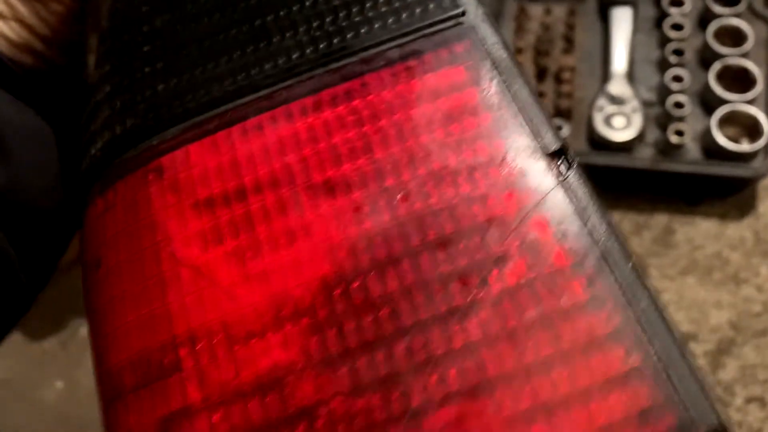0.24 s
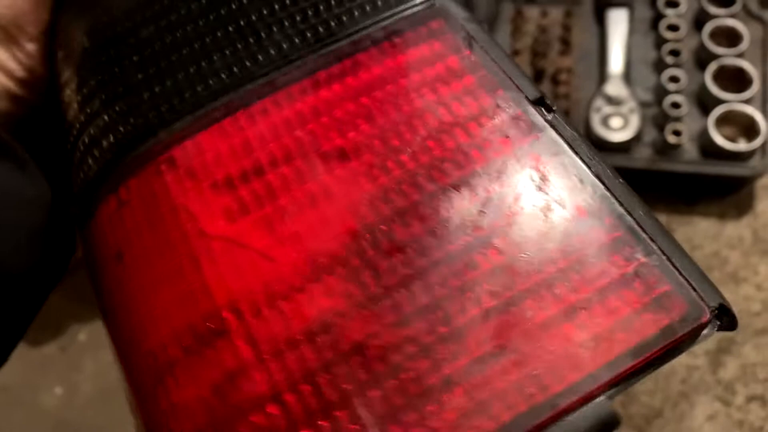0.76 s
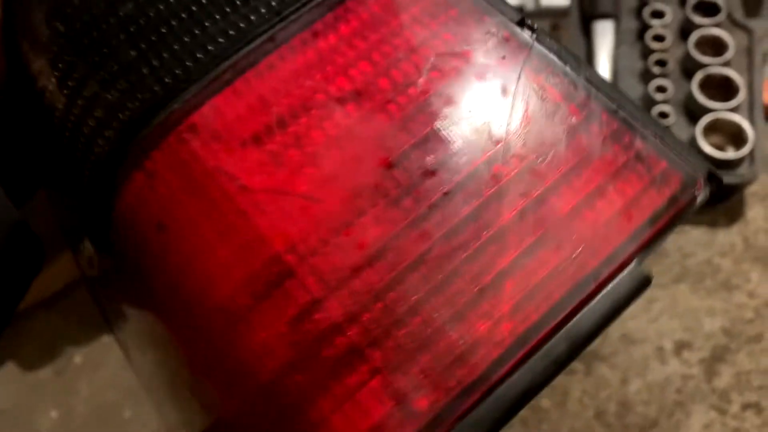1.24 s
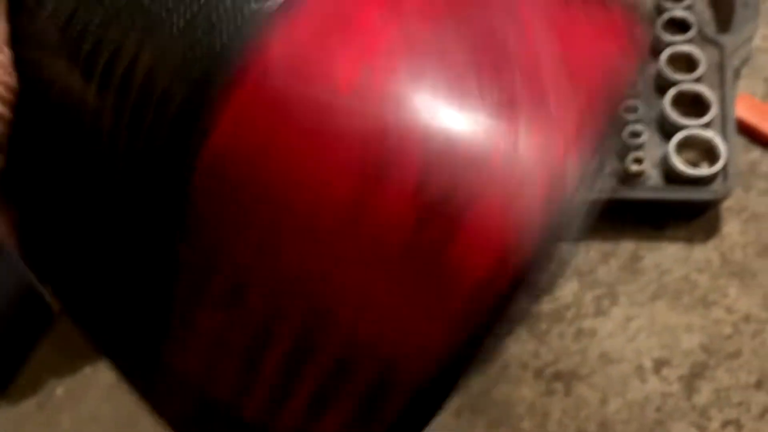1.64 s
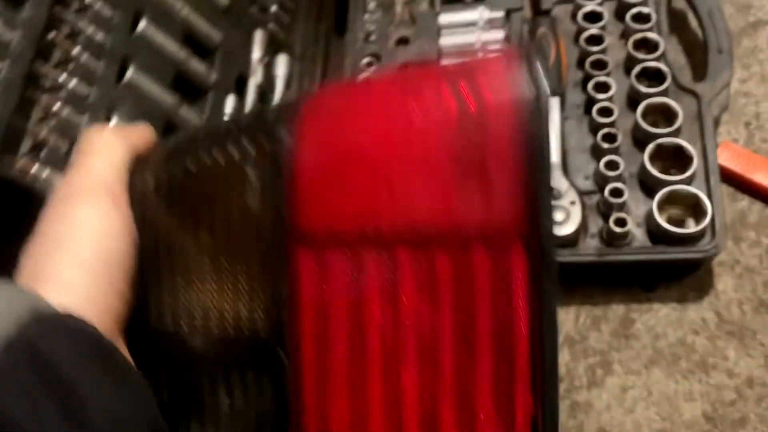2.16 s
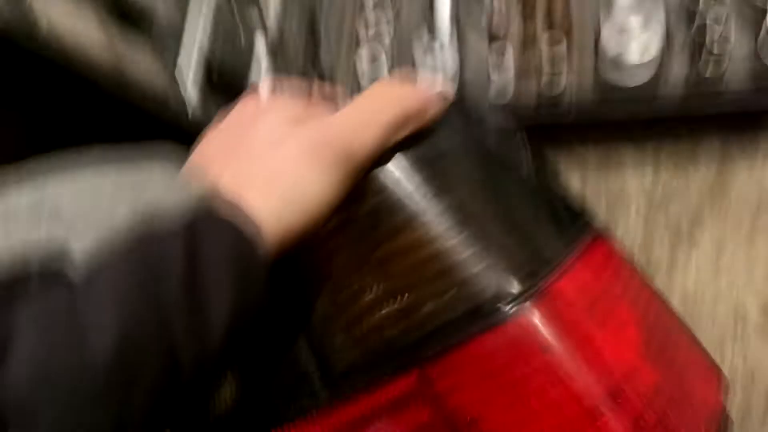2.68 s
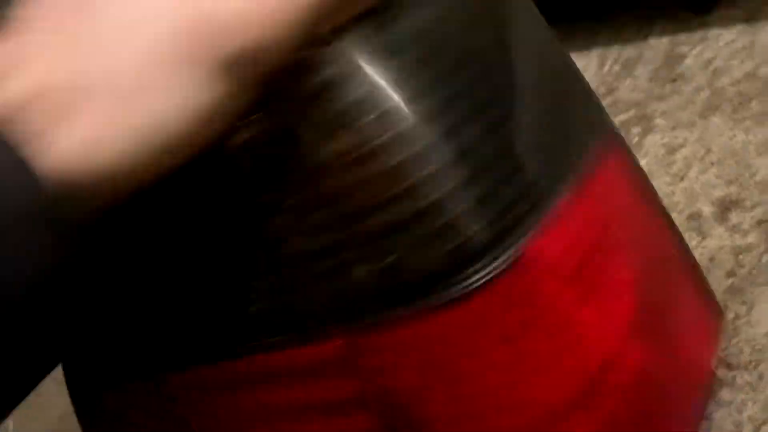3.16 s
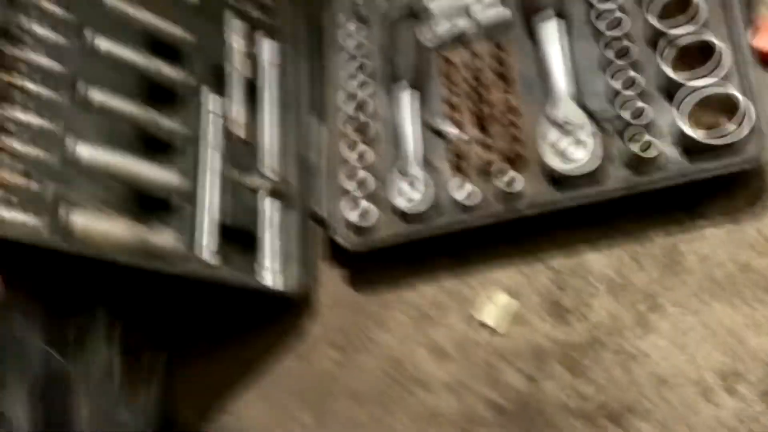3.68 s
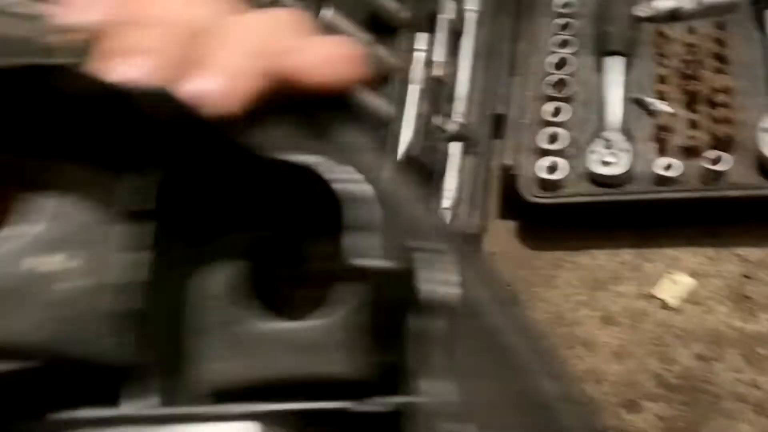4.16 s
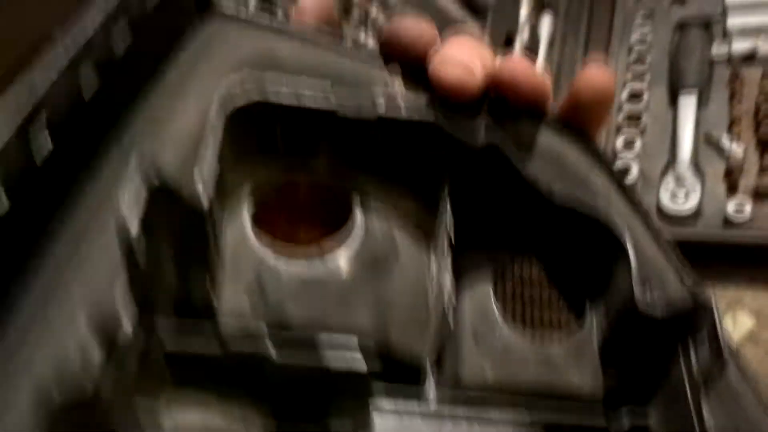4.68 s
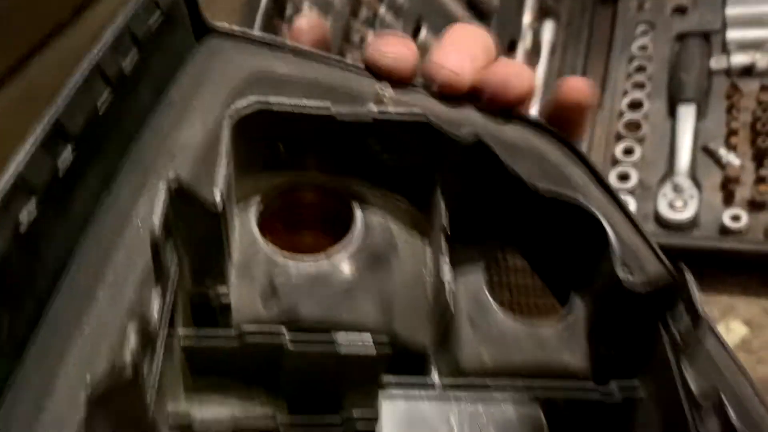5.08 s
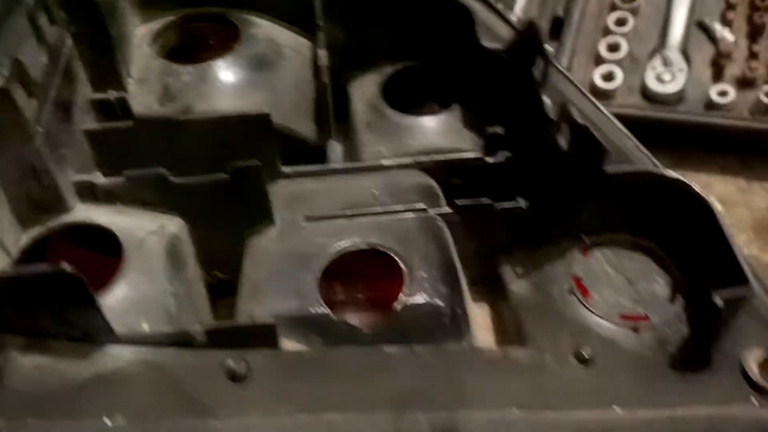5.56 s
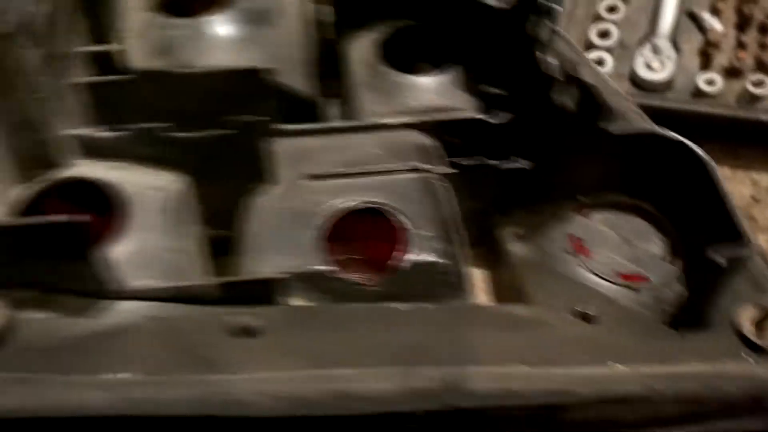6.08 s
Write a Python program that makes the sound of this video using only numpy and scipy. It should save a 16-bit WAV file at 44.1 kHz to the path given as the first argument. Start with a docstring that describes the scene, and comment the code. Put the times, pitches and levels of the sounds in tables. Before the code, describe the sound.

A hollow plastic car light housing is turned over in the hands in a quiet garage. A few faint finger clicks grow into a cluster of light taps and a soft rasp, then one sharp, hollow knock stands out. More taps, a crisp click and some rubbing follow before the handling settles. A sleeve swishes softly, and the close microphone picks up low bumps and rumble from the hand holding it.

```python
"""A hollow plastic lamp housing rings as it is turned over in the hands in a quiet garage.
Fingers tap, slip and rub on the shell, driving its cavity and panel modes; once it is knocked hard.
Strokes across ribs rasp, a sleeve swishes by cloth friction, and the hand that holds the microphone
passes on low bumps and rumble. Behind them: a faint squeak, a low wavering hum and still air."""
import sys
import numpy as np
from scipy import signal
from scipy.fft import rfft, irfft, next_fast_len
from scipy.io import wavfile

SR = 44100
rng = np.random.default_rng(int(sys.argv[2]) if len(sys.argv) > 2 else 0)


def wrap_up_sound(samples):
    """Save the sound to the file named by the first command line argument, as 16-bit audio."""
    columns = np.atleast_2d(samples).T
    # keep every value between -1 and 1, then stretch to whole-number steps
    tamed = np.clip(columns, -1, 1)
    steps = np.round(tamed * 32767).astype(np.int16)
    wavfile.write(sys.argv[1], SR, steps)


N = 278712
TIME_S = np.arange(N) / SR

# Finger contacts. Each row: start in seconds, crack level in dB, panel level in dB, cavity level in dB,
# first touch over the slip grains in dB, liveliest panel frequency in Hz, liveliest cavity frequency in Hz.
CONTACTS = [(0.414, -36.5, -56, -53, 6, 1030, 436), (0.453, -38, -57.5, -50, 6, 1790, 500),
            (0.5846, -36, -48, -50, 11, 1720, 480), (1.0493, -77, -66, -53.5, 19, 840, 510),
            (1.1576, -32.5, -52.5, -44, 10.5, 1140, 470), (1.4432, -52, -59, -83, 18, 1040, 320),
            (1.459, -60, -60.5, -56, 8, 1150, 295), (1.534, -55, -63, -70, 6, 1625, 510),
            (1.692, -33.5, -54, -43, 11, 1230, 336), (1.7302, -33, -55, -34.5, 8, 850, 570),
            (1.798, -32.5, -51, -35, 6.5, 810, 310), (1.8425, -59, -60, -73, 7, 1130, 357),
            (1.889, -36, -56, -48.5, 9, 1150, 530), (1.941, -33, -53, -36.5, 9, 1150, 302),
            (1.9663, -28.5, -44, -57, 12, 1200, 334), (1.9925, -45, -57, -43, 26, 821, 523),
            (2.035, -31.5, -55, -38.5, 3, 1200, 290), (2.06, -42, -51, -44, -3, 1200, 312),
            (2.091, -39, -55, -41, 13, 1230, 340), (2.118, -43, -52, -68, 9, 3636, 328),
            (2.5384, -48, -70, -39, 38, 2520, 400), (2.5505, -39, -53, -38, -1, 830, 625),
            (2.7563, -15, -17.5, -1.8, 14, 1060, 427), (2.823, -28.5, -41, -29, 1, 966, 444),
            (2.8455, -35, -46, -29, 24, 790, 456), (2.859, -31.5, -37.5, -40, -7, 2060, 394),
            (2.887, -32, -48, -44.5, 15, 880, 467), (2.9507, -43.5, -59, -62, 25, 1770, 507),
            (2.972, -41.5, -71, -42, 7, 860, 598), (3.0008, -39.5, -47, -68, 26, 1500, 470),
            (3.097, -57, -58, -79, 10, 1660, 425), (3.1746, -34.5, -52.5, -49, 21, 4920, 604),
            (3.1905, -33, -46.5, -42.5, -2, 1150, 600), (3.208, -44, -56, -62, 8, 1080, 570),
            (3.2247, -40, -57, -47, 18, 1120, 625), (3.264, -29, -46.5, -64, 7, 1940, 423),
            (3.2804, -32, -55.5, -46.5, 7, 1170, 517), (3.338, -41, -51.5, -54.5, 4, 1360, 417),
            (3.4142, -31, -47.5, -66.5, 7, 1455, 478), (3.5439, -39.5, -60.5, -55.5, 16, 1183, 436),
            (3.667, -39.5, -59, -48, 7.5, 820, 438), (3.6934, -42.5, -71, -46, 6, 827, 416),
            (3.7758, -43, -49, -44, 6, 1290, 627), (3.793, -41, -54, -43, 26, 1760, 522),
            (3.821, -55, -62, -42.5, -3, 780, 292), (3.8422, -39, -59, -51, 27, 1240, 400),
            (3.903, -34.5, -50, -40.5, -14, 1230, 530), (3.9202, -36, -50, -38, 6, 1230, 436),
            (3.94, -34, -64, -51, 4, 810, 413), (3.985, -59, -48, -48.5, 28, 1040, 430),
            (4.024, -47, -51, -73, -15, 1030, 440), (4.0515, -41, -52.5, -35, -14, 1140, 337),
            (4.1434, -39, -56, -53, 18, 1000, 470), (4.3067, -22.5, -31, -53, 1, 1220, 642),
            (4.3139, -20, -37, -30.5, 11, 1240, 468), (4.369, -34.5, -62, -58, 13, 3470, 420),
            (4.4447, -35.5, -57, -74, 6, 3600, 382), (4.472, -47, -45.5, -61.5, -12, 830, 440),
            (4.6125, -32, -38.5, -59, 8.5, 944, 460), (4.874, -42, -45, -54, -1, 774, 513),
            (4.972, -48.5, -57, -56.5, 16, 1920, 528), (4.993, -48, -58.5, -53, 10, 1500, 480),
            (5.054, -36, -46.5, -57, 8.5, 1190, 430), (5.0717, -35, -51, -66, 23, 4197, 442),
            (6.061, -55, -63, -72, 22, 794, 574)]


def shell(hard_knock_db=-25):
    """Fingers ring, rub and crack the shell. Light contacts favour some modes; a hard knock does not."""
    _, crack_db, panel_db, cavity_db, touch_db, panel_hz, cavity_hz = np.transpose(CONTACTS)
    bursts = slips(touch_db)
    light = cavity_db <= hard_knock_db
    n_cavity, n_modes = len(CAVITY_MODES), len(CAVITY_MODES + PANEL_MODES)
    lags = rng.integers(-9, 10, n_modes)[n_cavity:]  # samples; each panel has its own angle to the ports
    spot_db = 3.5 * rng.standard_normal((len(CONTACTS), n_modes)).T  # scatter by where the finger lands
    cavity = cavity_modes(bursts, light, cavity_db, cavity_hz, spot_db[:n_cavity])
    panels = panel_modes(bursts, light, panel_db, panel_hz, spot_db[n_cavity:], crack_db, lags)
    ringing = butter(cavity + panels, 300, "high")  # too small to radiate bass
    return ringing + rubbing() + cracks(bursts, crack_db)


def slips(touch_db, slip_s=0.019, grains_per_s=2000):
    """One burst per contact: a first touch, then uneven grains while the skin slips; energy 1."""
    t = np.arange(round(.08 * SR)) / SR
    chance, height = rng.random((len(touch_db), 2, len(t))).swapaxes(0, 1)
    grains = (chance < grains_per_s / SR) * (2 * height - 1) * np.exp(-(t / slip_s) ** 2)
    grains[:, 0] = from_db(touch_db)
    return grains / np.sqrt(np.sum(grains ** 2, axis=1, keepdims=True))


# Low shell modes. Each row: frequency in Hz, level in dB, T60 in seconds, left-right in dB, polarity.
CAVITY_MODES = [(334, -8, .021, 3, 1), (408, -14, .101, -1, -1), (427, 0, .081, 1.5, 1),
                (441, -12, .103, 13, -1), (506, -1.5, .022, -4, -1), (536, -21, .109, 0, 1),
                (600, -12, .015, 4, -1), (630, -26, .05, 0, 1)]
# Tight grips. Each row: start in seconds, end in seconds.
TIGHT_GRIPS = [(1.6, 2.7), (3.1, 3.5), (4.03, 4.2)]


def cavity_modes(bursts, light, cavity_db, liveliest_hz, spot_db, gripped_t60_s=0.021):
    """Low modes of the hollow shell; they die sooner when struck under a tight grip."""
    blows = bursts.copy()
    blows[~light, 1:] = 0  # a hard knock is one clean blow
    tight = np.any([(start < TIME_S) & (TIME_S < end) for start, end in TIGHT_GRIPS], axis=0)
    out = 0
    for k, (hz, mode_db, t60_s, side_db, polarity) in enumerate(CAVITY_MODES):
        octaves_away = np.abs(np.log2(hz / liveliest_hz))
        lively_db = lift_db(octaves_away) + spot_db[k] - (.5 * mode_db + 7)  # the hand evens out the modes
        drive = place(CONTACTS, blows, cavity_db + 5.5 + mode_db + light * lively_db)
        free = ring(drive * ~tight, hz, t60_s)
        damped = ring(drive * tight, hz, min(t60_s, gripped_t60_s))
        out += polarity * (free + damped) * sides(side_db)[:, None]
    return out


# Panel modes. Each row: frequency in Hz, level in dB, T60 in seconds, left-right in dB, signed weight.
PANEL_MODES = [(834.5, -8.5, 0.06, 0.5, 1), (1038.5, -3.5, 0.012, 0, -2), (1119, 4.5, 0.013, -2.5, 0.59),
               (1150, -6.5, 0.11, -1.5, 0.06), (1240, -7.5, 0.034, -1, 0.9), (1434, -5.5, 0.057, 1, -0.5),
               (1570, -7, 0.035, -6.5, 0.65), (1740, -8, 0.03, -0.5, -0.9), (2080, -5.5, 0.017, -6, 1),
               (2264, -0.5, 0.013, -2.5, 0), (2720, -4, 0.075, 5.5, 1.6), (2750, -1, 0.075, 3, 0.67),
               (3213, 4.5, .02, 0, 0.6), (3412, -6, .02, 1, -1), (3605, -1.5, 0.075, -4, 1.5),
               (4180, -1.5, 0.023, 9.5, -0.55), (5030, -5.5, 0.034, 4.5, 0.67),
               (5570, -5.5, 0.045, 13.5, 0.5)]


def panel_modes(bursts, light, panel_db, liveliest_hz, spot_db, crack_db, lags):
    """The plastic panels ring under the first touch and rattle on with the slip grains."""
    out = 0
    for k, (hz, mode_db, t60_s, side_db, weight) in enumerate(PANEL_MODES):
        octaves_away = np.abs(np.log2(hz / liveliest_hz))
        if hz < 2500:
            drive_db, loss_db = panel_db + 4.5, 3 * octaves_away
        else:  # soft skin hardly wakes the top modes, and they die fast
            drive_db, loss_db = crack_db - 4, 15
            t60_s = min(t60_s, .018)
        lively_db = lift_db(octaves_away) + spot_db[k] - loss_db
        drive = place(CONTACTS, bursts, drive_db + mode_db + light * lively_db)
        drive[0] = np.roll(drive[0], lags[k])
        out += weight * ring(drive, hz, t60_s) * sides(side_db)[:, None]
    return out


def lift_db(octaves_away):
    """A light touch lifts the modes near its liveliest frequency."""
    return 7 * np.exp(-(octaves_away / .15) ** 2)


def cracks(bursts, crack_db, t60_s=0.022, band_hz=(2500, 10000)):
    """Each touch and slip grain sets off a short splinter of bright noise."""
    decay = from_db(-60 * np.arange(bursts.shape[1]) / SR / t60_s)
    tails = decay * rng.standard_normal(bursts.shape)
    splinters = np.array([np.convolve(burst, tail)[:len(burst)] for burst, tail in zip(bursts, tails)])
    placed = place(CONTACTS, splinters, crack_db - 15.5)
    return butter(butter(placed, band_hz[0], "high"), band_hz[1])


# Position of the shell. Each row: time in seconds, left-right in dB.
SHELL_PAN = [(0, -2), (1.8, 1), (2.1, 1), (2.7, -0.6), (3.5, 1), (3.7, 2), (4.15, 9), (4.31, 4), (4.45, 4),
             (4.9, -2)]


def place(events, bursts, levels_db):
    """Lays the bursts at their start times, on the side where the shell is held."""
    out = np.zeros((2, N + bursts.shape[1]))
    for (start_s, *_), burst, level_db in zip(events, bursts, levels_db):
        at = round(start_s * SR)
        pan = sides(np.interp(start_s, *np.transpose(SHELL_PAN)))
        out[:, at:at + len(burst)] += np.outer(from_db(level_db) * pan, burst)
    return out[:, :N]


# Friction of sleeve and skin. Each row: time in seconds, swish level in dB,
# swish tilt in dB per octave, rubbing level in dB.
FRICTION = [(0.0, -79, 4.5, -90), (0.32, -75, 3.5, -84), (0.74, -70, 0.7, -61), (0.83, -75, 3.5, -67),
            (0.984, -74.5, 8.5, -61), (0.995, -110, 17.5, -89), (1.17, -86, 4, -90), (1.3, -79, 2, -85),
            (1.66, -71, 2, -85), (1.87, -65, 2.5, -70), (2.18, -53, 2.5, -51), (2.3, -55, 2, -57),
            (2.47, -63.5, -0.4, -54), (2.74, -63.5, -3, -65), (2.89, -53, -4.5, -67),
            (2.95, -79.5, -5, -71), (3.14, -72.5, -0.5, -75), (3.4, -64, 0.7, -64), (3.61, -69.5, -1, -66),
            (3.8, -64.5, -3, -77), (3.98, -65.5, -0.2, -56), (4.13, -57, -0.5, -43.5),
            (4.29, -68.5, -0.6, -73), (4.39, -65, 0.2, -69), (4.52, -58, 0.4, -51.5), (4.6, -55, -0.6, -40),
            (4.689, -59, 0.9, -61), (4.76, -59.5, -1.4, -45.5), (4.83, -68, -0.5, -49),
            (4.89, -63, 1.1, -85), (5.08, -67, 0.1, -66), (5.12, -70.5, 1.5, -66.5),
            (5.44, -61.5, 0.6, -65), (5.56, -68.5, 0.6, -64), (5.76, -70, 1.4, -68), (5.86, -75, 0, -76),
            (5.93, -85.5, -1.4, -76), (6.13, -65.5, 3, -84.5), (6.181, -67.5, 2.2, -74),
            (6.32, -61, 1.5, -66)]


def rubbing():
    """Skin friction drives the shell's modes below 1500 Hz with gritty noise."""
    mid, side = rng.standard_normal((2, N)) * from_db(2.5 * drift(40))
    grit = mid + 2.4 * side * [[1], [-1]]
    out = 0
    for modes, boost_db in (CAVITY_MODES, 0), (PANEL_MODES, 9.5):
        for hz, mode_db, t60_s, _, weight in modes:
            if hz < 1500:
                out += weight * ring(grit, hz, t60_s) * from_db(mode_db + boost_db)
    return from_db(curve(FRICTION, column=3) - 7) * rms_one(out)


# Strokes across ribs. Each row: start in seconds, length in seconds, ribs per second, level in dB,
# fade in dB, tilt in dB per octave.
RIB_STROKES = [(.29, .2, 1620, -72, -3, -1.5), (.51, .095, 1680, -64, .5, -2),
               (.67, .12, 1680, -62.5, 3, -2), (.835, .16, 1690, -76, -2, 4),
               (2.07, .68, 2720, -55, 10, .3), (4.45, .35, 3680, -57, 2.5, .3),
               (4.9, .15, 3850, -63, 3, .3)]
# Bands of slow strokes on fine ribs. Each row: multiple of the rib rate, level in dB.
SLOW_BANDS = [(1, -1.5), (2, 3.5), (2.75, 1), (4, -9), (6, -10)]
# Bands of fast strokes on two rib spacings. Each row: multiple of the rib rate, level in dB.
FAST_BANDS = [(1, -0.5), (1.4, -7.5), (2, -14)]


def rib_rasp(ramp_s=.03, edge_db=-21.5, edge_speed=.95, blur_share=0.17):
    """Each rib gives a small jolt: blurred bands at multiples of the rib rate."""
    start, length, ribs_per_s, stroke_db, fade_db, tilts_db = np.transpose(RIB_STROKES)
    end, end_db = start + length, stroke_db - fade_db
    # Strokes start and end quieter and slower.
    knots_s = np.transpose([start, start + ramp_s, end - ramp_s, end]).ravel()
    knots_db = np.transpose([stroke_db + edge_db, stroke_db, end_db, end_db + edge_db]).ravel()
    rate_hz = np.interp(TIME_S, knots_s, np.outer(ribs_per_s, [edge_speed, 1, 1, edge_speed]).ravel())
    tilt_db = np.interp(TIME_S, knots_s, np.repeat(tilts_db, 4))
    phase = 2 * np.pi * np.cumsum(rate_hz) / SR
    fast = rate_hz > 2000
    out = 0
    for bands, active in (SLOW_BANDS, ~fast), (FAST_BANDS, fast):
        blur_hz = blur_share * rate_hz[active].mean()
        for multiple, band_db in bands:
            wobble = rms_one(butter(rng.standard_normal((2, 2, N)), blur_hz))
            band = wobble[0] * np.cos(multiple * phase) + wobble[1] * np.sin(multiple * phase)
            out += active * from_db(band_db + tilt_db * np.log2(multiple)) * band
    return from_db(np.interp(TIME_S, knots_s, knots_db) + 1.5 * drift(30)) * out


# Cloth spectrum. Each row: frequency in Hz, density in dB.
CLOTH_SPECTRUM = [(180, -31), (300, -3.5), (500, 0), (619, -0.5), (846, -3), (1190, -4.5), (1800, -3),
                  (2550, -6.5), (4310, -7.5), (6290, -8.5), (8320, -16), (9980, -7.5), (12200, -20),
                  (14100, -17.5), (15300, -25.5)]


def sleeve_swish(flutter_db=1.8):
    """Cloth friction: octave bands that flutter a little apart and lean with the tilt."""
    cloth = stereo_noise(CLOTH_SPECTRUM)
    tilt_db = curve(FRICTION, column=2)
    shared_flutter = drift(6.4)
    out, lower = 0, 0
    for octave in range(-3, 3):
        upper = butter(cloth, min(4000 * 2. ** (octave + .5), .45 * SR), run=signal.sosfiltfilt)
        flutter = shared_flutter + 1.2 * drift(9)
        out += (upper - lower) * from_db(tilt_db * octave + flutter_db * flutter)
        lower = upper
    power = from_db(curve(FRICTION, column=1)) ** 2 + rustle_power()
    return from_db(5.5) * np.sqrt(power) * out


def rustle_power(t60_s=0.15, db_per_crack_db=0.61):
    """The sleeve rustles briefly after each contact, more after a louder crack."""
    start_s, crack_db = np.transpose(CONTACTS)[:2]
    onsets = np.zeros(N)
    onsets[(start_s * SR).astype(int)] = from_db(-63 + db_per_crack_db * (crack_db + 35)) ** 2
    return signal.lfilter([1], [1, -from_db(-120 / (t60_s * SR))], onsets + 1e-30)


# Jolts of the microphone case. Each row: start in seconds, level in dB.
CASE_JOLTS = [(0.107, -49), (0.416, -52), (0.5856, -53), (1.693, -44.5), (1.804, -36.5), (1.89, -40),
              (1.938, -41), (1.9672, -37), (1.9932, -39), (2.036, -37.5), (2.06, -38), (2.117, -37.5),
              (2.538, -40.5), (2.757, -27), (2.8437, -35), (2.889, -37), (2.973, -42), (3.1918, -48),
              (3.2244, -43.5), (3.2796, -45), (3.6953, -41), (3.8175, -37), (3.8255, -23), (3.8412, -34),
              (3.921, -41), (3.94, -42), (4.0503, -55), (4.1431, -37.5), (4.315, -42.5), (4.4763, -53),
              (4.6095, -39), (4.977, -49)]
# Modes of the case. Each row: frequency in Hz, level in dB, T60 in seconds.
CASE_MODES = [(102.6, -3.5, .04), (194, -7, 0.024)]


def microphone_bumps():
    """The microphone case, jolted in the hand, rings low and briefly."""
    clicks = place(CASE_JOLTS, np.ones((len(CASE_JOLTS), 1)), [db for _, db in CASE_JOLTS])
    jolts = butter(clicks, 330)
    return sum(from_db(mode_db) * ring(jolts, hz, t60_s) for hz, mode_db, t60_s in CASE_MODES)


# Hand rumble. Each row: time in seconds, level in dB.
RUMBLE_LEVELS = [(0, -88), (0.11, -61), (0.22, -76), (0.74, -65), (1.15, -77), (1.66, -69), (1.75, -52.5),
                 (2.2, -62), (2.72, -60), (2.8, -51.5), (2.95, -62.5), (3.5, -71.5), (3.82, -57),
                 (4.3, -65.5), (4.601, -56.5), (4.85, -74), (5.06, -61.5), (5.15, -66.5), (6.32, -72.5)]
# Its spectrum. Each row: frequency in Hz, density in dB.
RUMBLE_SPECTRUM = [(12, -47), (20, -13), (36, -10.5), (54, -9), (71, -11.5), (91, -18.5), (271, -21),
                   (307, -22.5), (400, -30), (520, -59), (880, -120)]


def hand_rumble():
    """The hand holding the microphone passes on uneven low noise."""
    return from_db(curve(RUMBLE_LEVELS) + 2 * drift(12)) * stereo_noise(RUMBLE_SPECTRUM)


# Squeak and hum. Each row: time in seconds, level in dB.
SQUEAK_LEVELS = [(5.08, -100), (5.12, -75), (5.3, -77), (5.75, -89.5), (5.85, -100)]
HUM_LEVELS = [(.9, -79), (1.05, -72.5), (1.38, -67), (1.46, -58), (1.65, -64), (1.8, -56), (2.05, -64),
              (2.2, -74), (2.35, -97)]


def wavering_tone(levels, hz, t60_s, width):
    """A squeak or hum: noise passed twice through one narrow resonance."""
    mid, side = rng.standard_normal((2, N))
    noise = mid + width * side * [[1], [-1]]
    return from_db(curve(levels)) * rms_one(ring(ring(noise, hz, t60_s), hz, t60_s))


def garage(x, t60_s=0.11, wall_cut_hz=3200):
    """Wall echoes: eight feedback delays a side, duller on every round."""
    size = next_fast_len(N + SR)
    hz = np.fft.rfftfreq(size, 1 / SR)
    response = np.zeros((2, len(hz)), complex)
    for k, lag_s in enumerate(rng.uniform(.010, 0.038, size=16)):
        wall_gain = from_db(-60 * lag_s / t60_s) / (1 + 1j * hz / wall_cut_hz)
        loop = wall_gain * np.exp(-2j * np.pi * hz * lag_s)
        response[k % 2] += loop / (1 - loop) * (-1) ** (k // 2)
    return irfft(response * rfft(x.mean(axis=0), size), size)[:, :N]


# Room noise spectrum. Each row: frequency in Hz, density in dB.
AIR_SPECTRUM = [(18, -32.5), (30, -3.5), (64, -1), (143, -9), (407, -10.5), (1320, -20.5), (4980, -34),
                (6470, -18), (8400, -23.5), (10100, -18.5), (12100, -37.5), (13400, -27), (15300, -40)]


def still_air(level_db=-72):
    """Steady faint noise of the quiet garage."""
    return from_db(level_db) * stereo_noise(AIR_SPECTRUM)


# Likeness at the two microphone ports. Each row: frequency in Hz, left-right correlation.
PORT_CORRELATION = [(60, 0.89), (130, 0.66), (290, 0.8), (640, 0.56), (1410, 0.0054), (3100, 0.54),
                    (6820, 0.1), (15000, 0.06)]


def stereo_noise(spectrum):
    """Coloured noise, partly alike in both channels because the ports are close; rms 1."""
    size = next_fast_len(N)
    hz = np.maximum(np.fft.rfftfreq(size, 1 / SR), 1)
    mid, side = rfft(rng.standard_normal((2, size))) * from_db(at_hz(spectrum, hz))
    alike = at_hz(PORT_CORRELATION, hz)
    both = np.sqrt(1 + alike) * mid + np.sqrt(1 - alike) * side * [[1], [-1]]
    return rms_one(irfft(both, size)[:, :N])


def ring(x, hz, t60_s):
    """Resonator: a unit click starts a decaying sine of height 1."""
    r, w = from_db(-60 / (t60_s * SR)), 2 * np.pi * hz / SR
    return signal.lfilter([0, np.sin(w)], [1, -2 * r * np.cos(w), r * r], x + 1e-18)


def drift(rate_hz):
    """Slow random wander of rms 1, drawn every 40 samples."""
    r = np.exp(-80 * np.pi * rate_hz / SR)
    slow = signal.lfilter([1], [1, -2 * r, r * r], rng.standard_normal(N // 40 + 2002))[2000:]
    return np.interp(np.arange(N) / 40, np.arange(len(slow)), rms_one(slow))


def butter(x, hz, kind="low", order=2, run=signal.sosfilt):
    """Low-pass or high-pass filter."""
    return run(signal.butter(order, hz, kind, fs=SR, output="sos"), x)


def curve(table, column=1):
    """One column of a timed table, read at every sample."""
    columns = np.transpose(table)
    return np.interp(TIME_S, columns[0], columns[column])


def at_hz(table, hz):
    """A table read on a log frequency axis."""
    knots_hz, values = np.transpose(table)
    return np.interp(np.log(hz), np.log(knots_hz), values)


def sides(db):
    """Left and right gains for a left-right difference."""
    return from_db([db / 2, -db / 2])


def from_db(db):
    """Decibels to gain."""
    return 10 ** (np.asarray(db) / 20)


def rms_one(x):
    """Scaled to rms 1."""
    return x / np.sqrt(np.mean(x ** 2) + 1e-20)


def scene():
    """Sums all sources; only the housing echoes in the garage."""
    housing = shell()
    background = microphone_bumps() + hand_rumble() + still_air()
    ribs = rib_rasp()
    squeak = wavering_tone(SQUEAK_LEVELS, hz=2000, t60_s=.025, width=0.52)
    hum = wavering_tone(HUM_LEVELS, hz=55.6, t60_s=0.41, width=0.18)
    return housing + ribs + sleeve_swish() + squeak + hum + from_db(-18) * garage(housing) + background


def record(dry, low_hz=38, top_hz=16400, ceiling=.93, knee=8):
    """Cuts the lowest bass, rounds the highest peaks and cuts the top."""
    trimmed = butter(dry, low_hz, "high", order=4)
    rounded = trimmed / (1 + (trimmed / ceiling) ** knee) ** (1 / knee)
    return signal.sosfilt(signal.cheby2(12, 70, top_hz, fs=SR, output="sos"), rounded)


dry = scene()
out = record(dry)
wrap_up_sound(out)
```